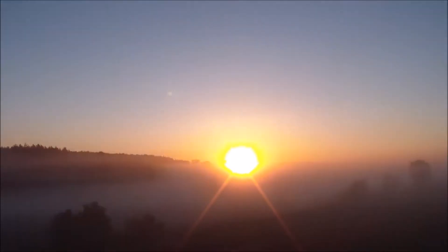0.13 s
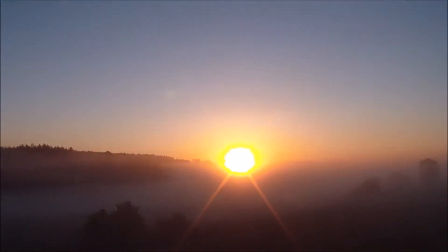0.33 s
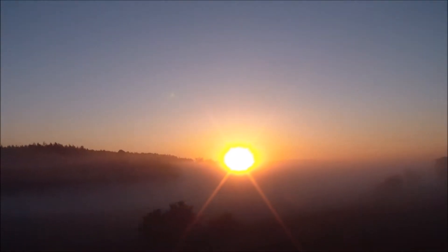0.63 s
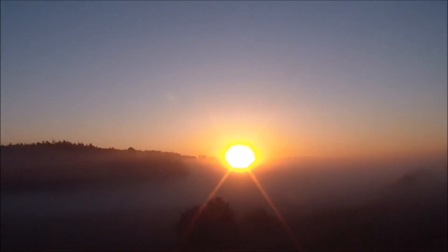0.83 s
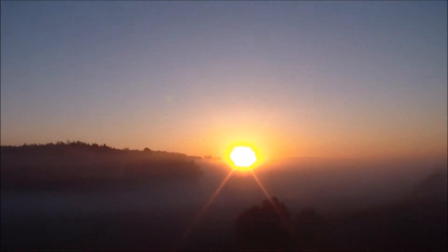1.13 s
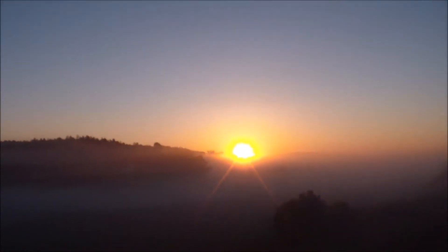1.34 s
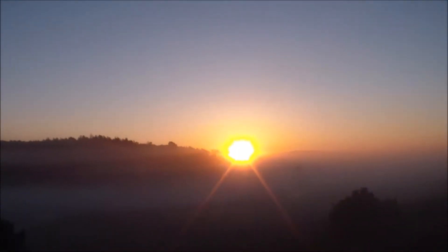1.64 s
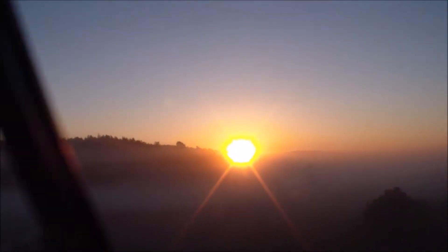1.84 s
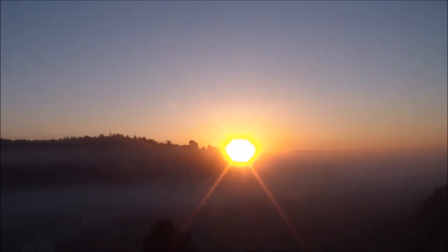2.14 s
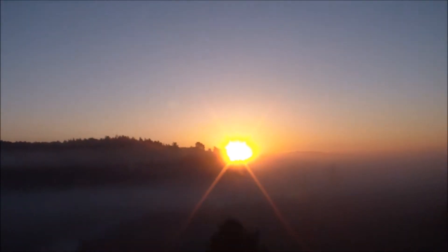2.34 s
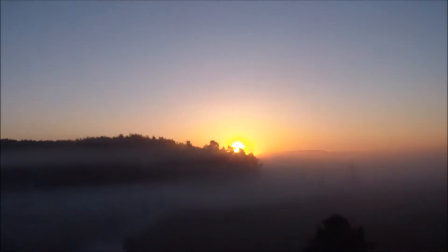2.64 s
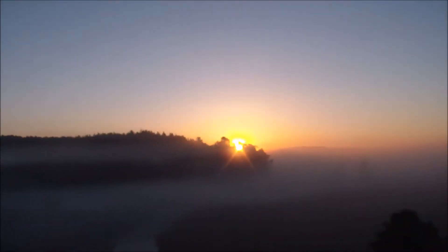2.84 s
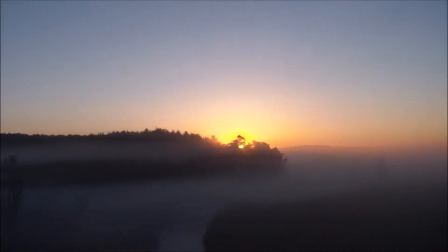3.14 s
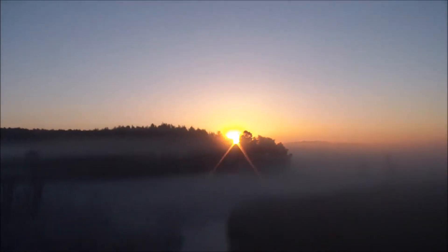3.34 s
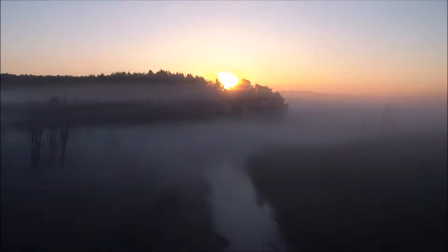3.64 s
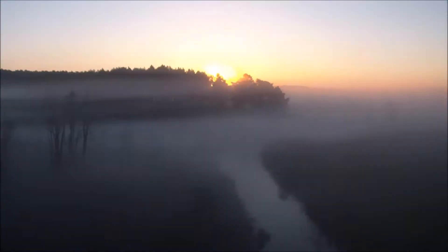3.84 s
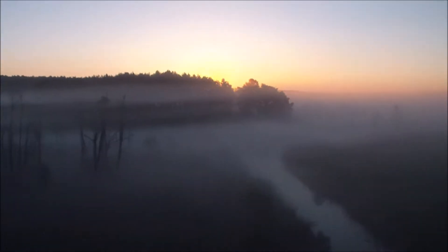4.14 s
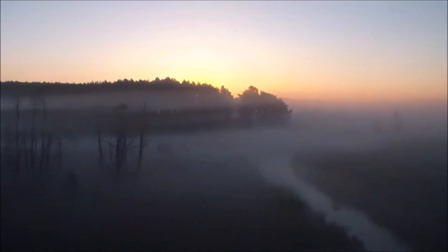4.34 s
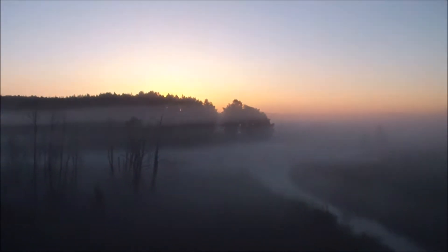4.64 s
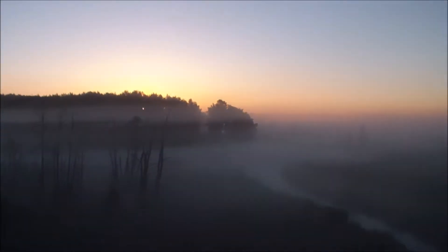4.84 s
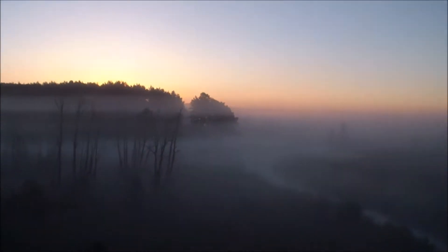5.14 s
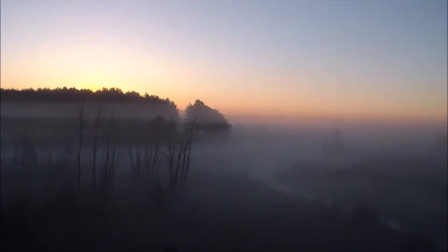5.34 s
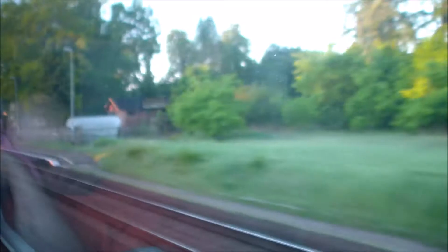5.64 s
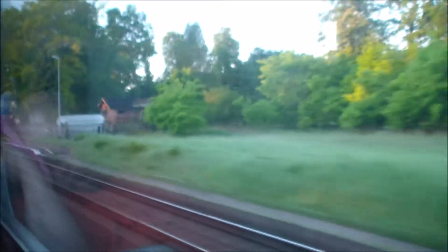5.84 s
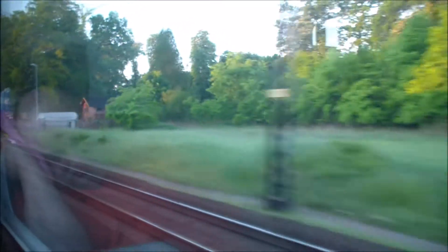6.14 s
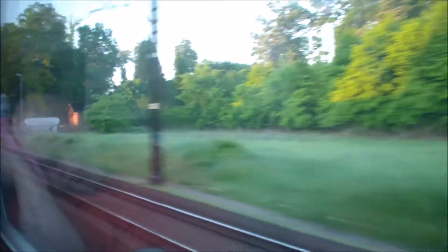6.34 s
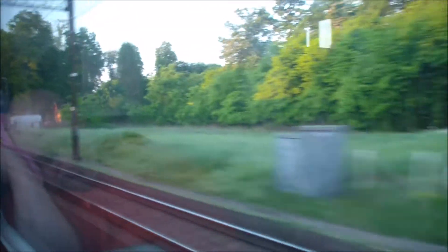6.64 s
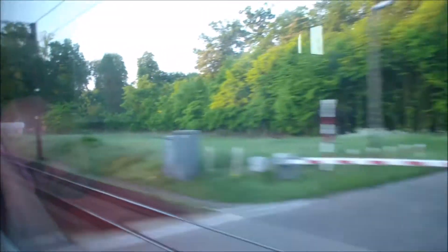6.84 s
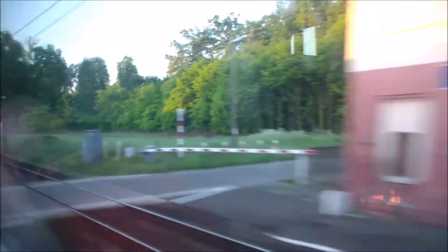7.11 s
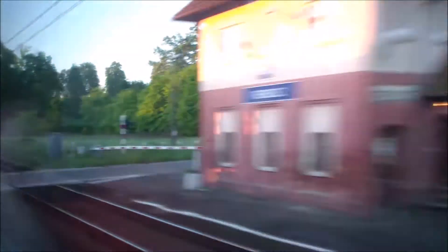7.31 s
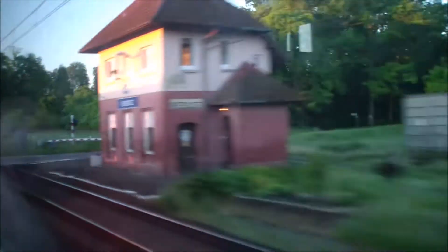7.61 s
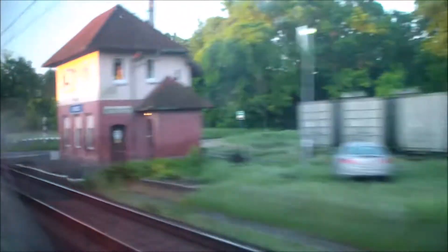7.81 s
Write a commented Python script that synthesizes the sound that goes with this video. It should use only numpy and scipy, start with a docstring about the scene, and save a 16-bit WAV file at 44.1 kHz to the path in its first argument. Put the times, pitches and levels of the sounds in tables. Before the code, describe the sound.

Harsh wind buffets an open train window, roaring, fluttering and crackling into overload, then snaps off to a quieter rumbling, hissing train ride.

```python
"""At an open window of a passenger train at speed. The slipstream hits two microphone ports in quick gusts and
overloads them: it roars, flutters and crackles. It is noise in bands, driven by a gust force; the train lies
faintly beneath it. The scene changes with a snap: the wind stops at once. After a brief near-silence comes the
sheltered ride: noise for the rumbling coach, roaring rails and hissing wheels, wavering sines for pumping air
and a singing rail, and short pulses for thumps of air."""
import sys
import numpy as np
from scipy import signal
from scipy.io import wavfile

SR = 44100
rng = np.random.default_rng(int(sys.argv[2]) if len(sys.argv) > 2 else 0)


def unload_wav(signal):
    """Save mono or channel-first audio to the path in sys.argv[1] as 16-bit WAV at rate SR, clipped to [-1, 1]."""
    wavfile.write(
        sys.argv[1],
        SR,
        np.round(np.clip(np.atleast_2d(signal).T, -1, 1) * 32767).astype(np.int16),
    )


N = 351477

MEAN_FORCE_DB = -26.0   # the wind force at which the turbulence has its plain colour


def from_db(db):
    """Turn decibels into gain."""
    return 10 ** (np.asarray(db) / 20)


def rms_one(x):
    """Scale to an rms (average strength) of 1."""
    return x / np.sqrt(np.mean(x ** 2) + 1e-20)


def seconds():
    """Give the time of every sample."""
    return np.arange(N) / SR


def in_time(rows):
    """Read the columns of a table at every sample, with straight lines between its times."""
    times, *columns = np.transpose(rows)
    return [np.interp(seconds(), times, column) for column in columns]


def at_hz(points, hz):
    """Read a table at a frequency, on a logarithmic frequency axis."""
    points = np.array(points)
    return np.interp(np.log(hz), np.log(points[:, 0]), points[:, 1])


def sides(left_right_db):
    """Split a level difference into dB for left and right."""
    return np.array([[.5], [-.5]]) * left_right_db


def drift(rate_hz):
    """Random wandering of spread 1: noise smoothed by two equal one-pole low-passes."""
    step = 40   # one slow value per 40 samples
    r = np.exp(-2 * np.pi * rate_hz * step / SR)
    noise = rng.standard_normal(N // step + 2002)
    slow = signal.lfilter([1], [1, -2 * r, r * r], noise)[2000:]   # drop the filter's start-up
    return np.interp(np.arange(N) / step, np.arange(len(slow)), rms_one(slow))


def noise_bands(count):
    """Yield (centre Hz, two unrelated noises) for bands across the audible range."""
    edges = np.geomspace(12, 17000, count + 1)
    white = rng.standard_normal((2, 2, N + SR))   # neighbouring bands take different noise
    for k, (low, high) in enumerate(zip(edges, edges[1:])):
        band = signal.butter(2, [low, high], "band", fs=SR, output="sos")
        noise = signal.sosfilt(band, white[k % 2])
        yield np.sqrt(low * high), noise[:, SR:]   # drop the filter's start-up


def resonate(x, hz, width_hz):
    """Ring at one frequency: a resonance with gain 1 at its top."""
    r = np.exp(-np.pi * width_hz / SR)
    top = np.array([1, 0, -1]) * (1 - r * r) / 2
    return signal.lfilter(top, [1, -2 * r * np.cos(2 * np.pi * hz / SR), r * r], x)


def low_pass(x, hz, order):
    """Take away the treble with a Butterworth low-pass."""
    return signal.sosfilt(signal.butter(order, min(hz, SR / 2 - 1), fs=SR, output="sos"), x)


def wind_force():
    """Force of the stream in dB about its mean: each gust rises steeply, sags and falls back into the lull."""
    # force of the stream between the gusts: (time [s], force [dB])
    lull = [(0.0, -29.5), (0.7, -30.5), (0.88, -33), (0.94, -40.5), (1.15, -27.5), (1.8, -31.5),
            (2.3, -34.5), (2.6, -35), (3.1, -34.5), (3.95, -32.5), (4.7, -26.5), (4.96, -36), (5.3, -37),
            (5.65, -34)]
    # gusts that hit the ports: (start [s], length [s], force [dB])
    wind_gusts = [(0.008, 0.045, -26.5), (0.092, 0.073, -15.5), (0.216, 0.11, -18), (0.332, 0.029, -20),
                  (0.37, 0.03, -20), (0.419, 0.078, -22), (0.496, 0.039, -22), (0.567, 0.057, -21),
                  (0.631, 0.024, -21.5), (0.795, 0.11, -22.5), (0.958, 0.047, -18), (1.024, 0.11, -22),
                  (1.169, 0.18, -20), (1.337, 0.18, -22), (1.559, 0.17, -18.5), (1.762, 0.06, -15.5),
                  (1.834, 0.042, -23.5), (1.919, 0.057, -22), (2.026, 0.044, -24), (2.071, 0.089, -19.5),
                  (2.201, 0.067, -21), (2.352, 0.054, -26), (2.389, 0.058, -24), (2.44, 0.047, -19),
                  (2.484, 0.04, -21.5), (2.523, 0.046, -18.5), (2.591, 0.079, -24.5), (2.659, 0.13, -22),
                  (2.779, 0.044, -20.5), (2.821, 0.052, -21.5), (2.911, 0.04, -22.5), (3.095, 0.033, -23),
                  (3.191, 0.067, -23), (3.342, 0.04, -13), (3.413, 0.07, -23), (3.494, 0.038, -17.5),
                  (3.552, 0.057, -24.5), (3.648, 0.12, -24), (3.823, 0.035, -18.5), (3.858, 0.031, -23),
                  (3.937, 0.095, -21), (4.035, 0.17, -18), (4.247, 0.048, -23), (4.342, 0.075, -20),
                  (4.435, 0.11, -20), (4.553, 0.056, -27), (4.632, 0.058, -18.5), (4.742, 0.025, -18),
                  (4.783, 0.13, -24.5), (5.127, 0.053, -19), (5.199, 0.067, -24), (5.427, 0.034, -29),
                  (5.497, 0.067, -28)]
    attack_s, rise_db_per_s = 0.0085, 1600   # a steep climb to full force
    release_s, fall_db_per_s = 0.013, 700    # a gentler letting go
    sag_db_per_s = 8.0                       # a slow slackening throughout
    t = seconds()
    force_db = in_time(lull)[0]
    for start, length, gust_db in wind_gusts:
        near = slice(*np.searchsorted(t, [start - .1, start + length + .1]))
        age = t[near] - start
        rise_db = rise_db_per_s * np.minimum(age - attack_s, 0)
        fall_db = fall_db_per_s * np.minimum(length - release_s - age, 0)
        sag_db = sag_db_per_s * (length / 2 - age)
        force_db[near] = np.maximum(force_db[near], gust_db + rise_db + sag_db + fall_db)
    return force_db - MEAN_FORCE_DB


def crackle(per_s, strength_db, width_s):
    """Extra force in dB, in short points at random times, from tiny eddies that brush one port only."""
    hits = (rng.random((2, N)) < per_s / SR) * strength_db
    point = np.bartlett(max(int(width_s * SR), 3)) ** 2
    return signal.oaconvolve(hits, point[None], "same", axes=1)


def slaps(level_db, fade_db_per_s):
    """Force of sharp-fronted eddies in dB about the mean: each arrives at once and dies within milliseconds."""
    # eddies that slap the ports: (time [s], peak force before level_db [dB])
    slap_list = [(0.0945, -3), (0.2254, -11), (0.3785, -5), (0.424, -5), (0.569, -17), (0.9647, -17.5),
                 (1.186, -1), (1.5182, -3.5), (1.6107, -7), (1.736, -9), (2.4453, -6), (2.827, -6),
                 (2.8988, -11.5), (2.9806, -10.5), (3.028, -8), (3.1, -8.5), (3.3472, -4), (3.6576, -9),
                 (3.713, -4), (3.9434, -9.5), (4.0332, -13), (4.9923, -8.5), (5.107, -6.5), (5.127, -7),
                 (5.405, -16), (5.599, -14.5)]
    t = seconds()
    force_db = np.full(N, -200.)   # as good as no force
    for s, peak_db in slap_list:
        force_db[int(s * SR)] = peak_db + level_db
    # hold each peak on a line that falls steadily
    fade_db = fade_db_per_s * t
    return np.maximum.accumulate(force_db + fade_db) - fade_db - MEAN_FORCE_DB


def slipstream(level_db, flutter_db, flutter_hz, port_flutter_db, port_flutter_hz, swell, lean,
               large_eddy_hz, small_eddy_hz, shared_hz, lumpy_db, patchy_db):
    """Turbulent pressure at each port: a stronger gust breaks into smaller eddies, so it is brighter and louder."""
    # how the stream meets the ports, before swell and lean:
    # (time [s], large eddies [dB], large left-right difference [dB], small left-right difference [dB])
    exposure = [(0.0, -1, 5, 2), (1.1, 0, 5.5, 3), (1.7, -2.5, 5.5, 6), (2.15, 0, 2.5, 0.5),
                (2.6, -1.5, 4.5, 8), (3.35, -0.5, 3.5, 2), (3.62, 0, 5.5, 3), (3.9, 2.5, 3, 3),
                (4.3, 1, 5, -2), (4.78, 4, 3, -6), (4.97, 2, 1.5, -1), (5.25, 4, 0.5, -6),
                (5.65, 7, 1.5, -11)]
    # colour of the turbulent pressure at mean force: (frequency [Hz], level per Hz [dB])
    turbulence = [(14, 3), (28, 0.5), (70, -0.5), (150, -6), (350, -11), (800, -15), (1600, -22),
                  (3200, -31.5), (5500, -40.5), (9000, -57.5), (15000, -53)]
    # how much a band follows the force: (frequency [Hz], band change per force change [dB/dB])
    gust_grip = [(30, 0.4), (90, 0.57), (250, 0.7945), (520, 0.676), (1000, 1.06), (2200, 1.1252),
                 (5000, 1.365), (12000, 1.33)]

    large_db, large_pan_db, small_pan_db = in_time(exposure)
    force_db = np.maximum(wind_force(), slaps(level_db=-9.5, fade_db_per_s=900))
    force_db = force_db + crackle(per_s=60, strength_db=4.785, width_s=0.0038)
    force_db = force_db + flutter_db * drift(flutter_hz)
    force_db = force_db + port_flutter_db * np.array([drift(port_flutter_hz), drift(port_flutter_hz)])
    large_db = swell * large_db + lumpy_db * drift(27)   # large eddies arrive in lumps

    out, power = 0, 0
    for hz, (common, difference) in noise_bands(count=20):
        alike = 0.53 / (1 + (hz / shared_hz) ** 2)   # only the deepest swings cover both ports
        noise = np.sqrt(1 + alike) * common + np.sqrt(max(1 - alike, 0)) * difference * [[1], [-1]]
        noise = noise * from_db(at_hz(turbulence, hz))
        # how far this band belongs to the large and to the small eddies
        large = np.exp(-.5 * (np.log(hz / large_eddy_hz) / 1.43) ** 2)
        small = 1 / (1 + (small_eddy_hz / hz) ** 2)
        balance_db = sides(lean * large * large_pan_db + small * small_pan_db)
        eddy_db = (large - alike) * large_db   # the eddies draw their energy from the deepest swings
        band_db = at_hz(gust_grip, hz) * force_db + eddy_db + balance_db + patchy_db * drift(25)
        out = out + noise * from_db(band_db)
        power += np.mean(noise ** 2)
    return from_db(level_db) * out / np.sqrt(power)


def overload(pressure, left_hz, right_hz):
    """The ports saturate: big swings flatten and choke the hiss, their steep flanks crackle; the right is duller."""
    limit, knee = 0.59, 3.24   # the pressure at which a port saturates, and how abruptly
    squash = (1 + np.abs(pressure / limit) ** knee) ** (1 / knee)
    left, right = pressure / squash
    return np.array([low_pass(left, left_hz, order=2), low_pass(right, right_hz, order=2)])


def ride_noise(spectrum, patchy_db, count):
    """Stereo noise of a given colour whose bands flicker a little; rms 1."""
    # left-right likeness of the ride: (frequency [Hz], likeness [0-1])
    ride_likeness = [(60, 0.96), (640, 0.98), (1400, 0.9), (3100, 0.81), (6800, 0.2), (15000, 0.1)]
    out = 0
    for hz, (mid, side) in noise_bands(count):
        if spectrum[0][0] <= hz <= spectrum[-1][0]:
            alike = np.clip(at_hz(ride_likeness, hz), 0, 1)
            gain = from_db(at_hz(spectrum, hz) + patchy_db * drift(10.0))
            out = out + gain * (np.sqrt(1 + alike) * mid + np.sqrt(1 - alike) * side * [[1], [-1]])
    return rms_one(out)


def coach_rumble(rumble_db):
    """The coach rumbles: deep noise whose level rises and falls."""
    # colour of the rumble: (frequency [Hz], level per Hz [dB])
    rumble_colour = [(12, -28), (24, -2), (45, 4), (64, -1.5), (92, 0), (122, -9), (220, -14.5), (300, -22),
                     (450, -28), (900, -69)]
    # level of the rumble before rumble_db: (time [s], level [dB])
    coach = [(5.72, -23), (6.33, -24.5), (6.68, -22), (6.71, -29.5), (6.97, -24), (7.95, -26.5)]
    gain = from_db(in_time(coach)[0] + rumble_db + sides(left_right_db=-2.0))
    return gain * ride_noise(rumble_colour, patchy_db=0.2, count=26)


def window_air(pump_hz, waver, uneven_db, thump_s):
    """Air pumps in and out of the opening at a wavering rate, with a harder thump now and then."""
    # pumping before its random unevenness: (time [s], level [dB])
    pumping = [(5.7, -23.5), (6.4, -19.5), (7.0, -18.5), (7.4, -26.5), (7.9, -19.5)]
    # single thumps of air: (time [s], peak [dB])
    thumps = [(5.917, -8), (6.263, -7.5), (6.574, -7), (6.73, -6), (7.106, -4), (7.372, -5), (7.494, -3),
              (7.59, -1), (7.747, -5)]
    t = seconds()
    phase = 2 * np.pi * np.cumsum(pump_hz * (1 + waver * drift(8.4))) / SR
    level_db = in_time(pumping)[0] + uneven_db * drift(1.86)
    air = np.sqrt(2) * np.sin(phase) * from_db(level_db)
    signs = rng.choice([-1, 1], len(thumps))   # a push or a pull
    for (s, peak_db), sign in zip(thumps, signs):
        age = np.maximum(t - s + thump_s / 2, 0) / thump_s   # the pulse peaks at age 1
        air = air + sign * from_db(peak_db) * age * np.exp(1 - np.minimum(age, 20))
    return air


def rail_roar(roughness_db, rail_db):
    """Rough rails roar under the wheels: noise that also rings in narrow resonances of the track."""
    # colour of the roar before the resonances: (frequency [Hz], level per Hz [dB])
    rail_colour = [(100, -23), (300, -13.5), (400, -11), (490, -8), (600, -4.5), (730, -4.5), (830, -4),
                   (950, -9), (1100, -8.5), (1400, -55.5), (3000, -45)]
    # narrow resonances of the track: (frequency [Hz], width [Hz], added level [dB])
    track_modes = [(644, 18, -4), (731, 16, 0), (800, 12, 5), (920, 8, 2)]
    roar = ride_noise(rail_colour, patchy_db=0.6, count=36)
    ringing = sum(from_db(db) * resonate(roar, hz, width) for hz, width, db in track_modes)
    return from_db(roughness_db + rail_db) * rms_one(roar + ringing)


def wheel_hiss(roughness_db, wheel_db):
    """The wheels hiss: brighter noise that follows most of the swing in roughness."""
    # colour of the hiss: (frequency [Hz], level per Hz [dB])
    wheel_colour = [(500, -16), (1100, -11), (1330, -16), (1550, 3), (1690, 2.5), (1900, -3), (2200, -3.5),
                    (2600, -7.5), (3100, -13.5), (4300, -16), (6000, -24.5), (8000, -32), (11000, -39.5),
                    (15000, -48)]
    follows = 0.83   # share of the swing that reaches the hiss
    mean_db = roughness_db.mean()
    level_db = mean_db + follows * (roughness_db - mean_db)
    return from_db(level_db + wheel_db) * ride_noise(wheel_colour, patchy_db=0.5, count=40)


def ride(rumble_db, rail_db, wheel_db, shake_db):
    """Out of the stream: rumble, window air, and rolling noise whose level shakes quickly."""
    # roughness of the rails, heard as the level of the rolling noise before rail_db and wheel_db:
    # (time [s], level [dB])
    roughness = [(5.72, -24.5), (5.79, -28), (5.81, -33.5), (5.89, -24.5), (5.92, -30.5), (6.05, -23.5),
                 (6.3, -29), (6.31, -29), (6.56, -24.5), (6.59, -31.5), (6.68, -25.5), (6.76, -32.5),
                 (6.98, -28.5), (7.01, -31), (7.31, -25.5), (7.63, -29.5), (7.67, -28.5), (7.95, -31)]
    roughness_db = in_time(roughness)[0]
    air = window_air(pump_hz=25, waver=0.2452, uneven_db=4.5, thump_s=0.0045)
    air = from_db(sides(left_right_db=-5.0)) * air
    rail = rail_roar(roughness_db, rail_db) + singing(waver=0.011)
    rail = from_db(sides(left_right_db=-1.0)) * rail
    rolling = rail + wheel_hiss(roughness_db, wheel_db)
    return coach_rumble(rumble_db) + air + rolling * from_db(shake_db * drift(38))


def limiter(x, ceiling_db, release_db_per_s):
    """A peak over the ceiling ducks everything at once; the gain then creeps back."""
    peak_db = 20 * np.log10(np.abs(x).max(axis=0) + 1e-9)
    over_db = np.maximum(peak_db - ceiling_db, 0)
    recovery_db = release_db_per_s * seconds()
    return x * from_db(recovery_db - np.maximum.accumulate(over_db + recovery_db))


def snap(start_s, level_db, fade_s):
    """A short bright snap just as the scene changes and the wind stops: white noise that dies away at once."""
    age = seconds() - start_s
    fade = (age > 0) * np.exp(-np.clip(age / fade_s, 0, 30))
    return from_db(level_db) * rng.standard_normal((2, N)) * fade


def singing(waver):
    """The rail sings briefly under a wheel: one track resonance holds a wavering note that swells and fades."""
    # sung notes: (start [s], length [s], frequency before the waver [Hz], level at full swell [dB])
    notes = [(5.73, 0.085, 712, -25.5), (6.623, 0.12, 722, -29), (6.86, 0.15, 718, -29)]
    t, out = seconds(), np.zeros(N)
    wavering_time = np.cumsum(1 + waver * drift(24.5)) / SR
    for start, length, hz, level_db in notes:
        swell = np.sin(np.pi * np.clip((t - start) / length, 0, 1))
        out += np.sqrt(2) * from_db(level_db) * swell * np.sin(2 * np.pi * hz * wavering_time)
    return out


def scene():
    """First the wind with the train faint beneath it, a brief near-silence, then the sheltered ride."""
    wind_end_s, ride_start_s = 5.662, 5.695
    t = seconds()
    wind = slipstream(level_db=-5.5, flutter_db=3.0, flutter_hz=42.0, port_flutter_db=3.0, port_flutter_hz=57,
                      swell=1.43, lean=1.95, large_eddy_hz=281, small_eddy_hz=2100, shared_hz=55.7,
                      lumpy_db=3.5, patchy_db=1.33)
    train = ride(rumble_db=5.0, rail_db=1.5, wheel_db=-3.0, shake_db=1.5)
    train = limiter(train, ceiling_db=-4.5, release_db_per_s=93.0)
    exposed = overload(wind + from_db(-18.5) * train, left_hz=11700, right_hz=8900)
    near_silence = from_db(-23) * train
    sound = np.select([t < wind_end_s, t < ride_start_s], [exposed, near_silence], train)
    return sound + snap(start_s=5.6615, level_db=-15.5, fade_s=0.0011)


def record(dry):
    """The deepest bass is shed gently and the top is cut steeply."""
    bass_cut = signal.butter(1, 8, "high", fs=SR, output="sos")
    top_cut = signal.ellip(10, .1, 80, 15750, fs=SR, output="sos")   # cutoff in Hz
    return signal.sosfilt(top_cut, signal.sosfilt(bass_cut, dry))


dry = scene()
out = record(dry)
unload_wav(out)
```